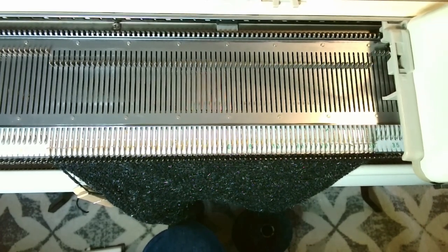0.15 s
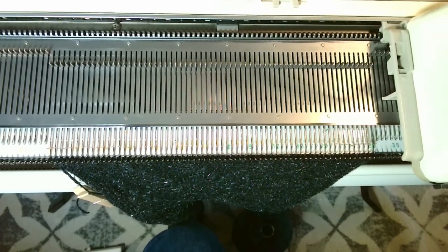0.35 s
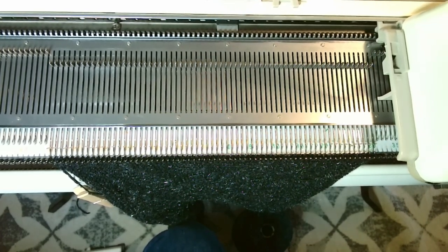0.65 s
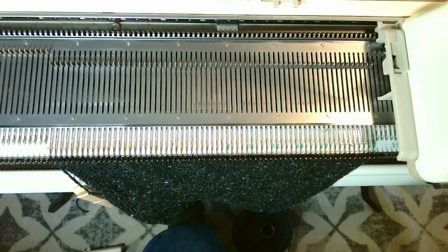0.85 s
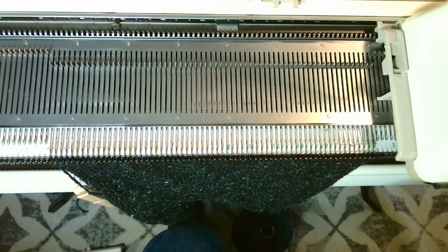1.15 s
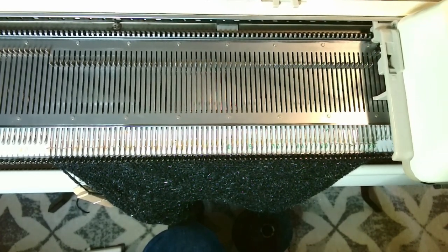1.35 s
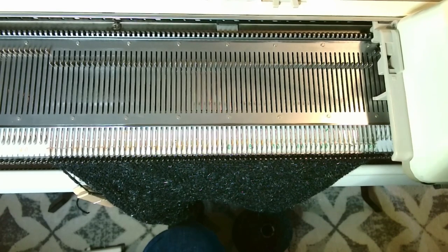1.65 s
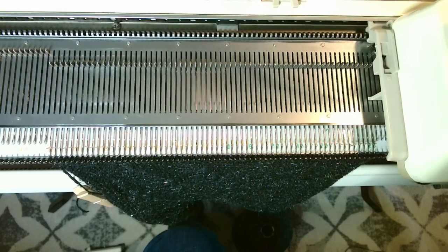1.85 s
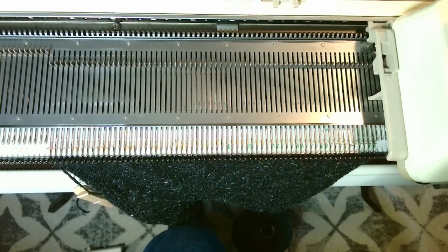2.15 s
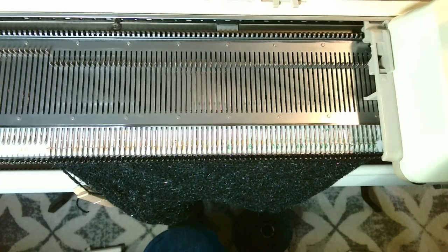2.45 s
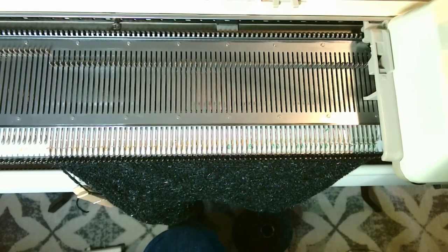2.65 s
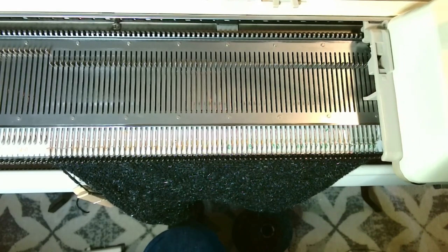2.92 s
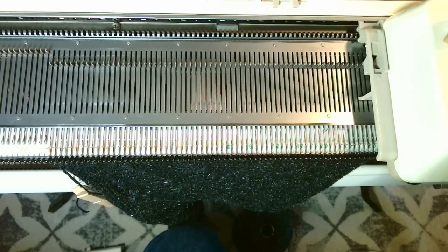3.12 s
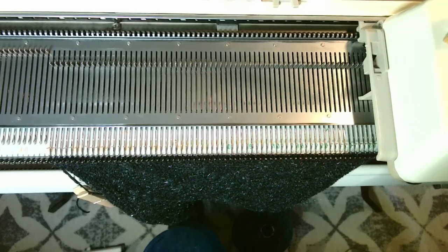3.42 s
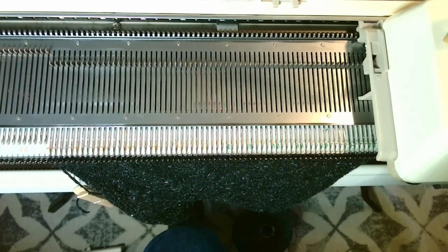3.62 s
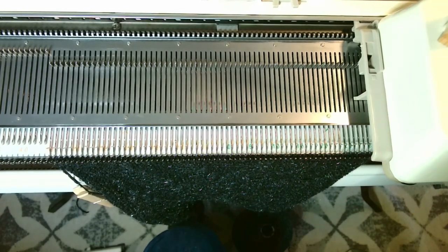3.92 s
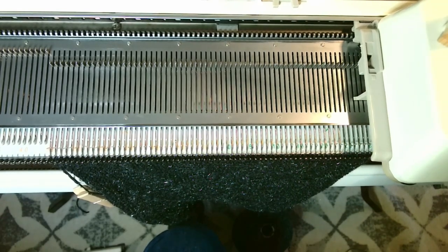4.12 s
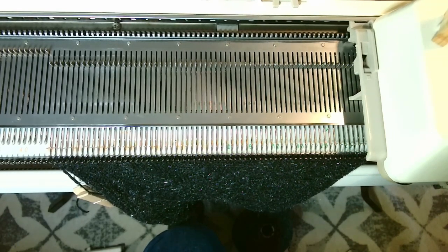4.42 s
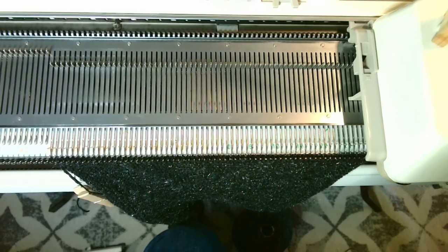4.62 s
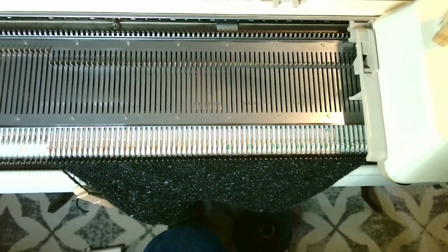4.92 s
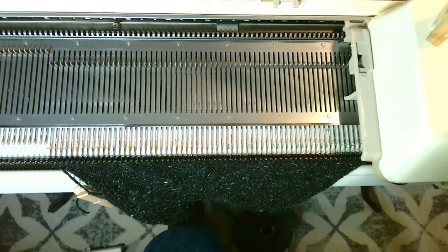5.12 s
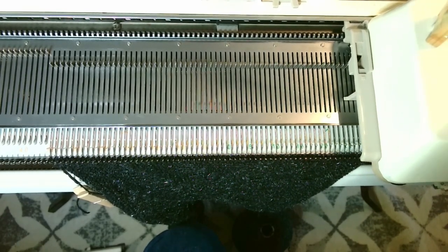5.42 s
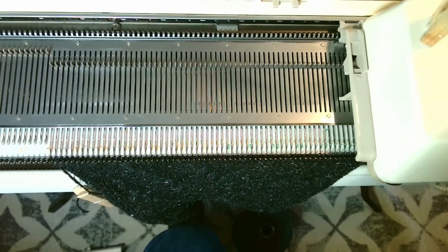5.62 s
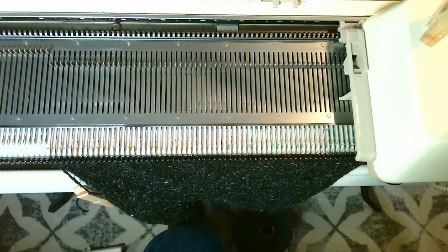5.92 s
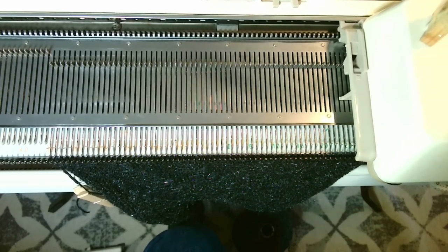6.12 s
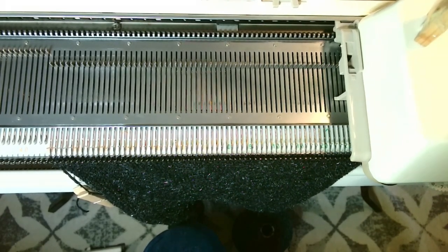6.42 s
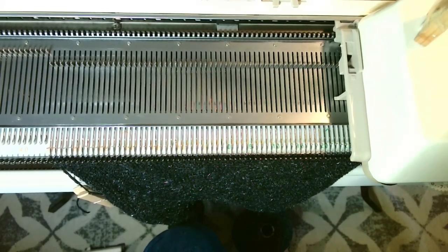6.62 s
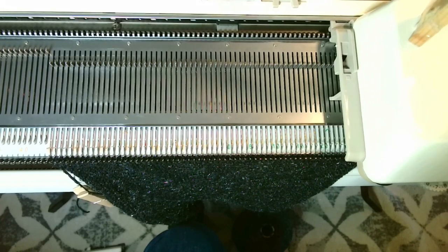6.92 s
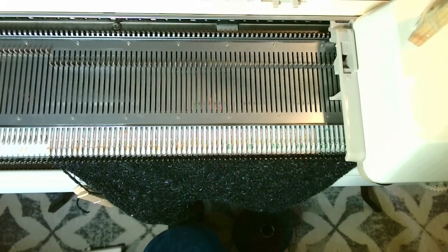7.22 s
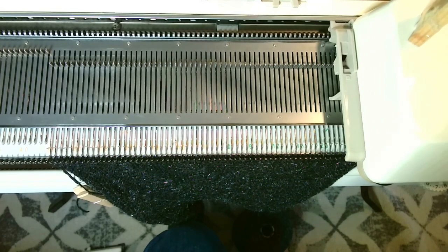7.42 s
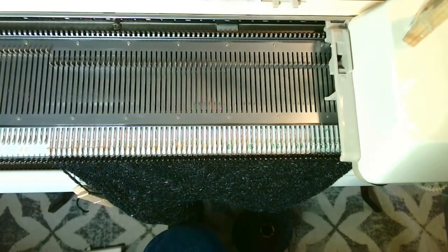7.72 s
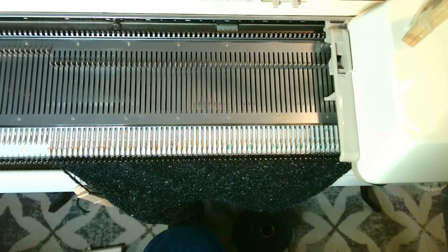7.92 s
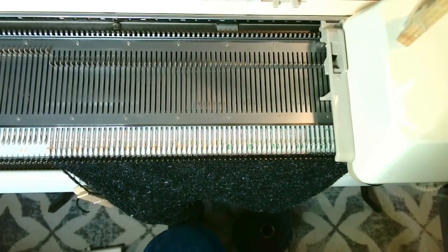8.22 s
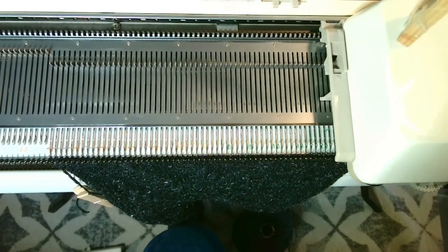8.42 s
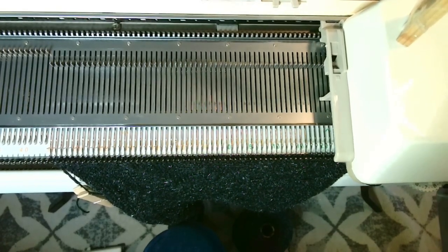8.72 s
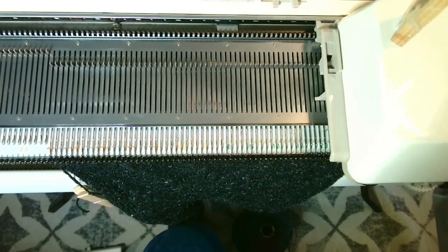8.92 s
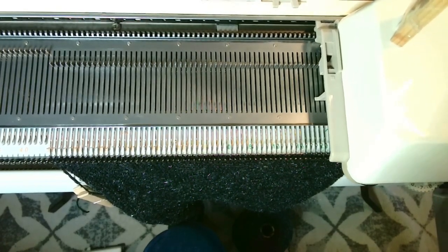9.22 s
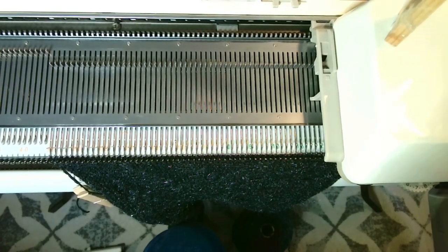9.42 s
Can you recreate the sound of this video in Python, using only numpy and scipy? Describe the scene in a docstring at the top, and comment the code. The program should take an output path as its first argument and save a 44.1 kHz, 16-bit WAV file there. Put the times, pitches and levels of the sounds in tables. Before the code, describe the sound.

A motor-driven knitting machine carriage creeps along its steel needle bed, running from start to finish. The same quick run of bright needle ticks, latch clicks and plastic clacks repeats about every two thirds of a second over a fine rattle and soft low thumps. Loose parts clink, and now and then a needle catches with a sharper tick. The microphone is close, in a small room.

```python
"""A motor-driven knitting machine carriage is already inching along its steel bed in a small room.
Each step, one needle long, plays the same run of cam, needle and latch contacts, which ring the bed,
the plastic cover, the needles and the latches over the fine rattle of the drive. The frame thumps
as the drive pushes, loose parts clink, and a needle chirps in its cam. Now and then one snags harder.
As the carriage moves on, its resonances shift, the chirp fades and the steps slow very slightly."""
import sys
import numpy as np
from scipy import signal
from scipy.fft import rfft, irfft, next_fast_len
from scipy.io import wavfile

SR = 44100
rng = np.random.default_rng(int(sys.argv[2]) if len(sys.argv) > 2 else 0)


def int16_out(signal):
    """Quantize to a 16-bit WAV file."""
    q = np.round(np.clip(np.atleast_2d(signal).T, -1, 1) * 32767)
    wavfile.write(sys.argv[1], SR, q.astype(np.int16))


N = 421575

FIRST_STEP_S, STEP_S, STEP_GROWS_S, STEP_COUNT = -.2764, .62985, .0000964, 16
# ring of the steel needles: pitch_hz, width_hz, gain_db
NEEDLE_MODES = [(3715, 496, -3), (3875, 185, 3), (4351, 484, 2), (4670, 1500, -10.5), (5120, 680, -19.5)]
NEEDLE_PART = (NEEDLE_MODES, 3200, 6500)   # a part is: modes, low_hz, high_hz


def from_db(db):
    """Decibels to gain."""
    return 10 ** (np.asarray(db) / 20)


def rms_one(x):
    """Scale to rms 1."""
    return x / np.sqrt(np.mean(x ** 2) + 1e-20)


def band(x, low_hz, high_hz, order=2):
    """Butterworth band-pass."""
    sos = signal.butter(order, [low_hz, min(high_hz, .45 * SR)], "band", fs=SR, output="sos")
    return signal.sosfilt(sos, x)


def place(times, sounds):
    """Lay short sounds (one per row) on the timeline."""
    at = np.round(times * SR).astype(int)[:, None] + np.arange(sounds.shape[1])
    inside = (at >= 0) & (at < N)
    return np.bincount(at[inside], sounds[inside], N) + 1e-18


def each_step(offsets):
    """Times of events that recur in every step; each step lasts a little longer than the one before."""
    k = np.arange(STEP_COUNT)[:, None]
    return (FIRST_STEP_S + STEP_S * k + STEP_GROWS_S * k * k / 2 + offsets).ravel()


def load_db(times):
    """Load on the drive, rising and falling alike in every step."""
    # load curve within a step: offset_s, level_db
    load = [(0, 0), (.04, 1.5), (.22, 3), (.265, -1), (.35, 2.5), (.45, -0.5), (.51, 0.5), (.58, -.5),
            (.63, -3.5)]
    starts = each_step(0)
    step = np.maximum(np.searchsorted(starts, times) - 1, 0)
    return np.interp(times - starts[step], *np.transpose(load))


def resonate(x, modes, low_hz, high_hz):
    """Parallel resonances of a part that radiates between two frequencies."""
    out = 0
    for k, (hz, width_hz, db) in enumerate(modes):
        r = np.exp(-np.pi * width_hz / SR)
        feed = np.array([1, 0, -1]) * (1 - r * r) / 2
        ring = signal.lfilter(feed, [1, -2 * r * np.cos(2 * np.pi * hz / SR), r * r], x)
        out = out + (-1) ** k * from_db(db) * ring
    return band(out, low_hz, high_hz)


def strike(times, level_db, part, chatter_s, uneven_chatter=0.43, size=512):
    """Each contact is a brief chatter of tiny impacts, snappy or drawn out, that sets the part ringing."""
    t = np.arange(size) / SR
    chance = rng.standard_normal((len(times), size + 1))
    length_s = chatter_s * np.exp(uneven_chatter * chance[:, :1])
    bursts = chance[:, 1:] * np.sqrt(t) * np.exp(-t / length_s)
    # level_db sets the energy of the ring, as if spread over 1 ms
    power = np.sum(resonate(bursts, *part) ** 2, axis=1) / (SR / 1000)
    gains = from_db(level_db) / np.sqrt(power)
    return resonate(place(times, bursts * gains[:, None]), *part)


def rattle(part, per_s, spread_db, follows):
    """Dense little impacts of gears and sliding metal, harder when the drive is loaded; rms 1."""
    size_db = follows * load_db(np.arange(N) / SR) + spread_db * np.minimum(rng.exponential(1, N), 4)
    sizes = from_db(size_db) * rng.choice([-1, 1], N)
    impacts = sizes * (rng.random(N) < per_s / SR)
    return rms_one(resonate(impacts + 1e-18, *part))


def light_contacts(per_s=80, needle_db=-25.5, body_db=-34.5, latch_db=-44, uneven_db=2.0, follows=1.2):
    """Neighbouring needles jostle, harder under load; rows of start_s, needle_db, body_db, latch_db."""
    count = int(per_s * N / SR)
    times = (np.arange(count) + rng.random(count)) / per_s
    force_db = follows * load_db(times) + uneven_db * rng.standard_normal(count)
    return np.column_stack([times, force_db + needle_db, force_db + body_db, force_db + latch_db])


def main_contacts(jitter_s=.0004, uneven_db=1.43, rebound_s=.0045, uneven_rebound=.25, loss_db=5.5):
    """Every step's contacts, each with one softer rebound; rows as in light_contacts."""
    # cam, needle and latch hits within a step: offset_s, needle_db, body_db, latch_db
    contacts = [(.0065, -17, -28.5, -37), (.0274, -17.5, -31, -36.5), (.036, -15, -22.5, -34),
                (0.0471, -13, -27.5, -41), (0.0626, -20, -29.5, -37), (.073, -11.5, -22, -29.5),
                (0.084, -19.5, -24.5, -30), (0.0915, -11, -25, -26), (.104, -22, -34, -35),
                (0.1256, -15, -24.5, -36), (0.1383, -13.5, -26.5, -31), (.146, -16.5, -26.5, -40),
                (0.1743, -18, -29.5, -31.5), (.206, -19.5, -28, -25), (.213, -16.5, -27, -29),
                (0.2206, -12, -21.5, -24.5), (.228, -19.5, -23, -34.5), (.2375, -15.5, -23.5, -45),
                (0.2693, -18.5, -30, -35), (0.2857, -22, -38, -33.5), (.2985, -17, -25, -42),
                (.3096, -16, -27, -48), (0.3304, -11, -22.5, -33), (0.3386, -11, -20.5, -29.5),
                (0.3478, -20, -26.5, -36), (0.3613, -12.5, -25.5, -30.5), (.3955, -29, -28.5, -42),
                (.418, -18, -28.5, -33), (0.4672, -19, -29.5, -38.5), (0.502, -17, -28, -36),
                (0.5457, -20.5, -43, -37), (.5727, -16, -26.5, -33.5), (0.6249, -23.5, -32, -50)]
    pattern = np.array(contacts)
    chance = rng.standard_normal((STEP_COUNT * len(pattern), 3))
    times = each_step(pattern[:, 0]) + jitter_s * chance[:, 0]
    levels = np.tile(pattern[:, 1:], (STEP_COUNT, 1)) + uneven_db * chance[:, 1:2]
    rebounds = times + rebound_s * np.exp(uneven_rebound * chance[:, 2])
    return np.vstack([np.column_stack([times, levels]), np.column_stack([rebounds, levels - loss_db])])


def carriage(colour_db=1.3, bed_follows=0.73):
    """Contacts and drive rattle sound through four parts: bed, cover, needles and latches."""
    # knock of the steel bed: pitch_hz, width_hz, gain_db
    bed_modes = [(141, 49, -13.5), (276.7, 41.4, -9), (345, 33, -9), (410, 84, -11), (573, 71, -4),
                 (629.7, 29.4, -2), (714, 32, -4), (826.6, 60, -1.5), (1150, 350, -7.5)]
    # clack of the plastic cover: pitch_hz, width_hz, gain_db
    cover_modes = [(1486, 106, -5), (1740, 96, -3), (1998, 260, -2), (2345, 555, -1), (3060, 460, 0.5)]
    # tick of the latches: pitch_hz, width_hz, gain_db
    latch_modes = [(6070, 1500, 14.5), (6450, 240, 2.5), (9290, 5400, -4.5), (10670, 1600, -9),
                   (12700, 830, -16), (16000, 1300, -3.5)]
    bed, cover, latches = (bed_modes, 130, 1400), (cover_modes, 1200, 3400), (latch_modes, 5900, 18000)
    times, *levels = np.vstack([main_contacts(), light_contacts()]).T
    needle_db, body_db, latch_db = levels + colour_db * rng.standard_normal((len(times), 3)).T
    bed_db = body_db.mean() + bed_follows * (body_db - body_db.mean())   # the heavy bed evens out blows
    knock = from_db(-3.0) * strike(times, bed_db, bed, chatter_s=0.00059)
    knock += from_db(-42.5) * rattle(bed, per_s=2500, spread_db=1.0, follows=2.24)
    clack = from_db(-1.3) * strike(times, body_db, cover, chatter_s=0.0026)
    clack += from_db(-40) * rattle(cover, per_s=2700, spread_db=1.0, follows=0.95)
    ring = from_db(0.5) * strike(times, needle_db, NEEDLE_PART, chatter_s=0.0015)
    ring += from_db(-31.5) * rattle(NEEDLE_PART, per_s=2000, spread_db=1.1, follows=0.62)
    tick = from_db(1.5) * strike(times, latch_db, latches, chatter_s=0.0027)
    tick += from_db(-49.5) * rattle(latches, per_s=3000, spread_db=3.5, follows=1.9)
    return knock + clack + ring + tick


def frame(uneven_db=0.1, soft_hz=220, rumble_db=-56.0, drone_db=-61,
          rumble_follows=1.27, drone_follows=2.0):
    """Soft pushes of the drive rock the frame, over a rumble and a rough drone that swell with the load."""
    # pushes within a step: offset_s, level_db
    pushes = [(.04, -43.5), (.129, -42), (.179, -33), (.22, -34.5), (.272, -42), (.31, -44), (.338, -41.5),
              (.402, -42)]
    # slow swings of the frame and its table: pitch_hz, gain_db, t60_s
    swings = [(16, -5, .45), (32, 0, .15), (78, -2, .1), (120, -8, .06), (157, -11, .06)]
    offsets, push_db = np.transpose(pushes)
    times = each_step(offsets)
    sizes = from_db(np.tile(push_db, STEP_COUNT) + uneven_db * rng.standard_normal(len(times)))
    force = signal.sosfilt(signal.butter(2, soft_hz, fs=SR, output="sos"), place(times, sizes[:, None]))
    rumble = rms_one(band(rng.standard_normal(N), 18, 42, order=1))
    drone = rms_one(band(rng.standard_normal(N), 65, 90))
    load = load_db(np.arange(N) / SR)
    out = from_db(rumble_db + rumble_follows * load) * rumble
    out += from_db(drone_db + drone_follows * load) * drone
    for hz, db, t60_s in swings:
        r, w = from_db(-60 / (t60_s * SR)), 2 * np.pi * hz / SR
        out += from_db(db) * signal.lfilter([0, np.sin(w)], [1, -2 * r * np.cos(w), r * r], force)
    return out


def clinks(width_hz=220, uneven_db=1.5, jitter_s=.0006):
    """Loose small parts chatter briefly, each ringing at its own pitch."""
    # clinks within a step: offset_s, pitch_hz, level_db
    loose_parts = [(.071, 1900, -22), (.093, 4560, -15), (.126, 3096, -19.5), (.139, 2522, -22.5),
                   (.222, 1950, -24.5), (.238, 2970, -29), (0.33, 6630, -25), (.36, 5720, -21),
                   (.572, 2420, -24.5)]
    out = 0
    for offset_s, hz, db in loose_parts:
        timing, force = rng.standard_normal((STEP_COUNT, 2)).T
        times = each_step(offset_s) + jitter_s * timing
        part = ([(hz, width_hz, 0)], hz / 2, hz * 2)
        out = out + strike(times, db + uneven_db * force, part, chatter_s=.0016)
    return out


def chirps(offset_s=.1765, pitch_hz=10450, width_hz=420, first_db=-22, fade_db_per_s=0.75,
           jitter_s=0.002, uneven_db=2.5):
    """Once a step a needle slips in its cam with a tiny high squeak, fainter as the carriage moves on."""
    timing, force = rng.standard_normal((STEP_COUNT, 2)).T
    times = each_step(offset_s) + jitter_s * timing
    needle = ([(pitch_hz, width_hz, 0)], 9300, 11400)
    return strike(times, first_db - fade_db_per_s * times + uneven_db * force, needle, chatter_s=0.002)


def snags():
    """Now and then a needle catches harder than usual and rings out."""
    # hard catches: start_s, level_db
    catches = [(0.5655, -13), (.6911, -13), (1.3212, -8), (2.576, -12), (2.964, -9), (6.1204, -9.5),
               (8.014, -11), (8.644, -14), (8.76, -13), (9.277, -11)]
    times, level_db = np.transpose(catches)
    return strike(times, level_db, NEEDLE_PART, chatter_s=0.00093)


def travel(x):
    """The carriage drives each resonance more or less strongly according to where it stands."""
    # resonances that grow or fade along the bed: pitch_hz, width_hz, first_db, last_db
    shifts = [(457, 94, -4, 0), (785, 56, 0.5, 7), (1850, 470, 2.5, 3), (5120, 490, -0.5, 1.5),
              (12040, 12800, 0, 2)]
    for hz, width_hz, first_db, last_db in shifts:
        gain = from_db(np.linspace(first_db, last_db, N))
        x = x + (gain - 1) * band(x, hz - width_hz / 2, hz + width_hz / 2, order=1)
    return x


def reflections(x, t60_s, count, size=16384):
    """A dense decaying tail that crossfades through `count` patterns as the carriage moves."""
    t = np.arange(size) / SR
    tails = rng.standard_normal((count, size)) * from_db(-60 * t / t60_s) * (t > .001)
    position, out = np.linspace(0, count - 1, N), np.zeros(N + size)
    for k, tail in enumerate(tails):
        near = np.flatnonzero(abs(position - k) < 1)
        crossfade = np.sqrt(1 - abs(position[near] - k))
        heard = signal.fftconvolve(x[near] * crossfade, tail / np.sqrt(np.sum(tail ** 2)))
        out[near[0]:near[0] + len(heard)] += heard
    return out[:N]


def room(x, t60_s=0.34, dull_hz=8000):
    """A small room, a little duller than the direct sound."""
    lowpass = signal.butter(1, dull_hz, fs=SR, output="sos")
    return signal.sosfilt(lowpass, reflections(x, t60_s, count=12))


def widen(mid, diffuse_t60_s=0.049):
    """A faint diffuse stereo spread widens the treble; the lows stay nearly central."""
    # stereo width, side against mid: frequency_hz, side_db
    width = [(60, -23.5), (700, -47), (2400, -33), (4400, -15), (8000, -10), (15000, -5)]
    hz, side_db = np.transpose(width)
    padded = next_fast_len(N + 4096)
    bins_hz = np.fft.rfftfreq(padded, 1 / SR)
    gain = from_db(np.interp(np.log(bins_hz + 1), np.log(hz), side_db))
    diffuse = reflections(mid, diffuse_t60_s, count=6)
    side = irfft(rfft(diffuse, padded) * gain, padded)[:N]
    return np.array([mid + side, mid - side])


def scene():
    """The machine close by, with its room, in stereo."""
    # how hard the carriage drags: time_s, gain_db
    drag_curve = [(0, 0.35), (1.8, -.8), (8, -1), (9.56, -0.6)]
    drag = from_db(np.interp(np.arange(N) / SR, *np.transpose(drag_curve)))
    machine = drag * travel(carriage() + snags()) + clinks() + chirps()
    return widen(machine + from_db(-10.0) * room(machine) + frame())


def record(dry, cutoff_hz=15900):
    """A steep low-pass takes off the very top."""
    return signal.sosfilt(signal.ellip(10, .2, 70, cutoff_hz, fs=SR, output="sos"), dry)


dry = scene()
out = record(dry)
int16_out(out)
```